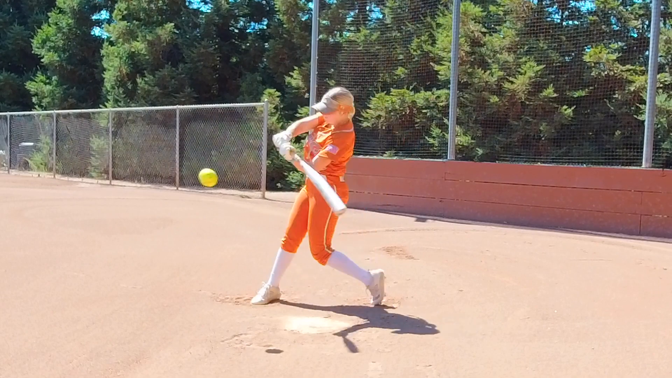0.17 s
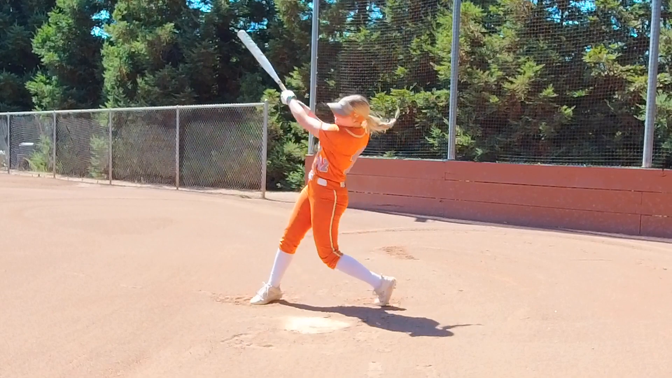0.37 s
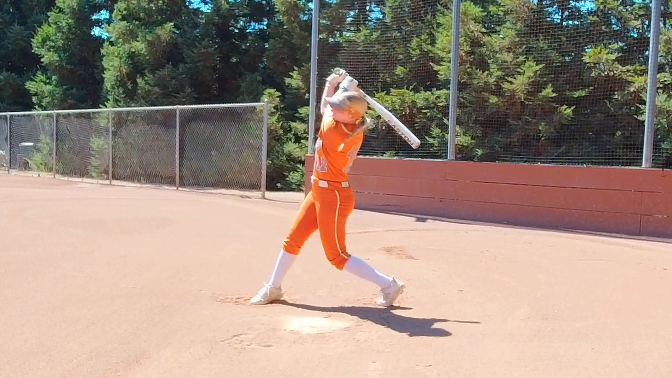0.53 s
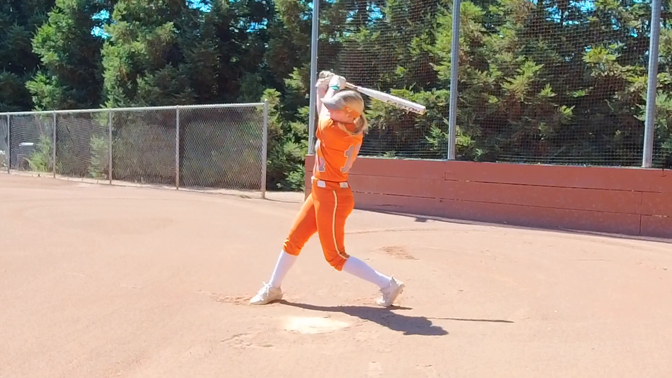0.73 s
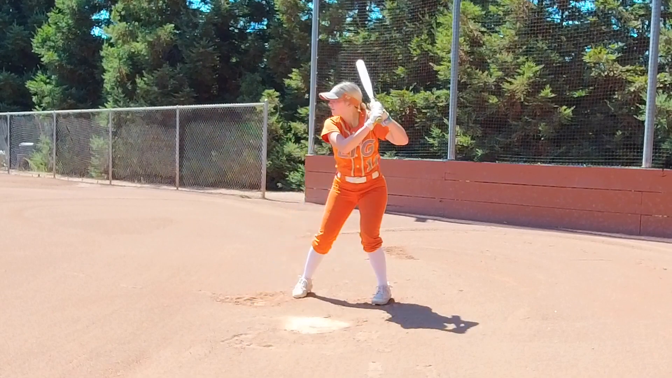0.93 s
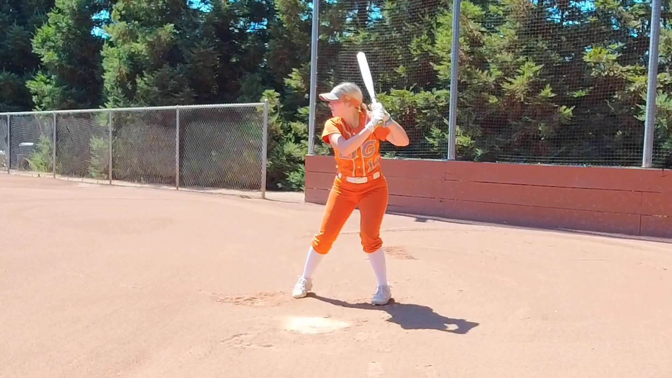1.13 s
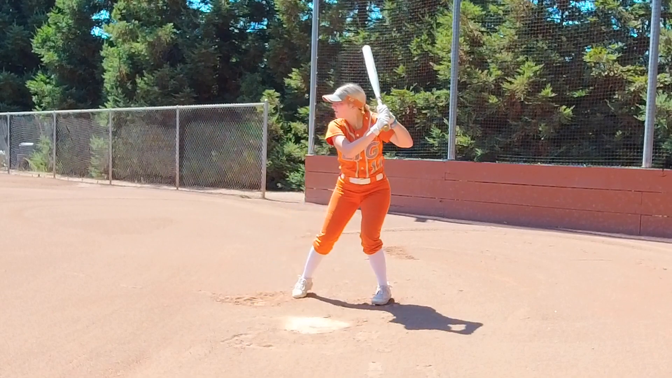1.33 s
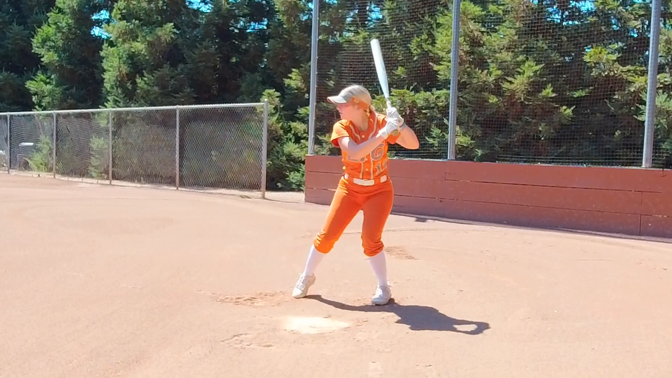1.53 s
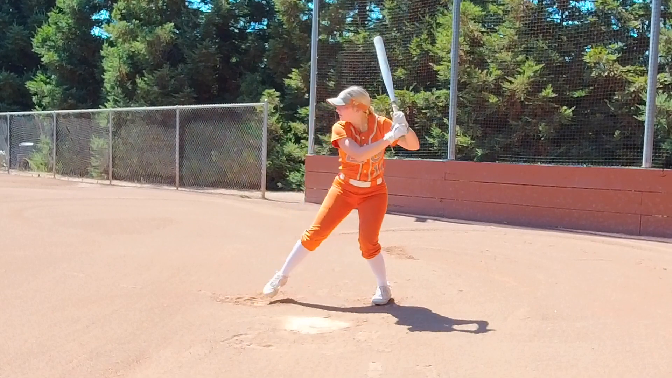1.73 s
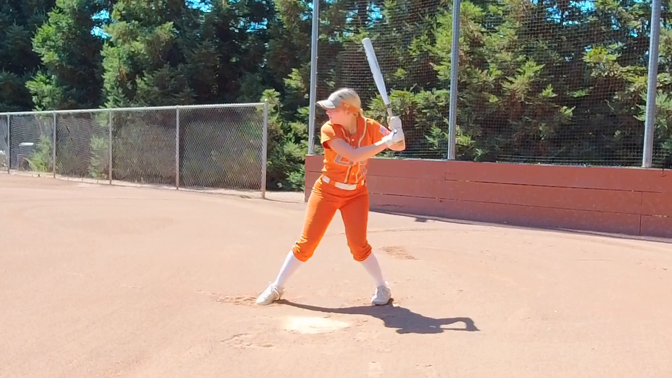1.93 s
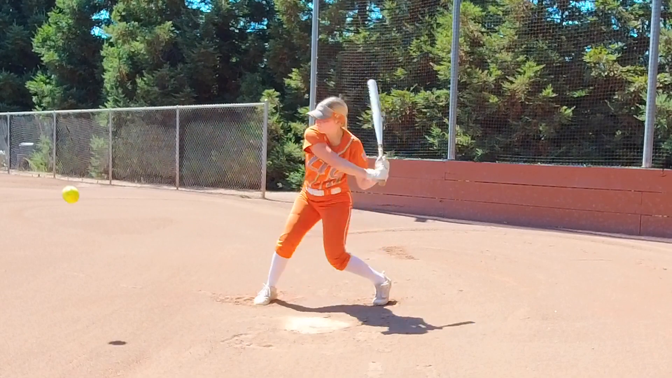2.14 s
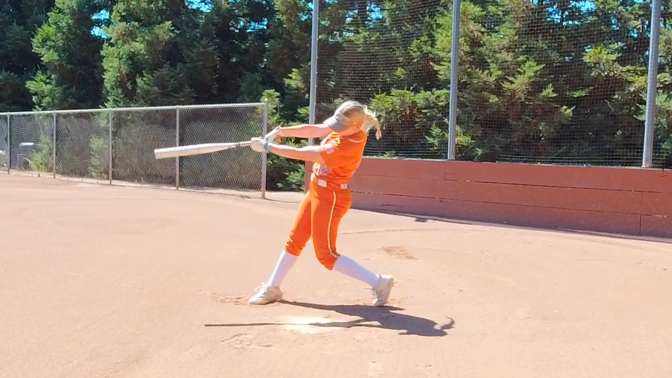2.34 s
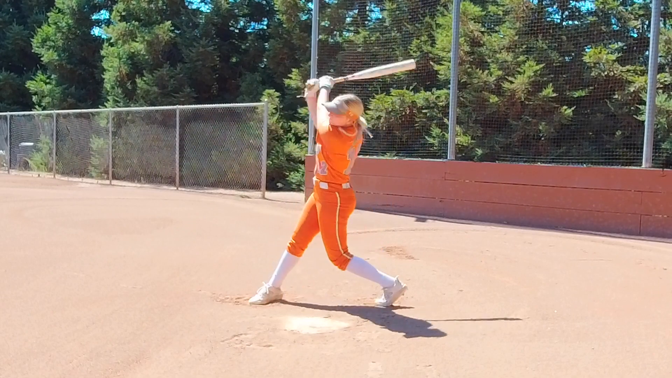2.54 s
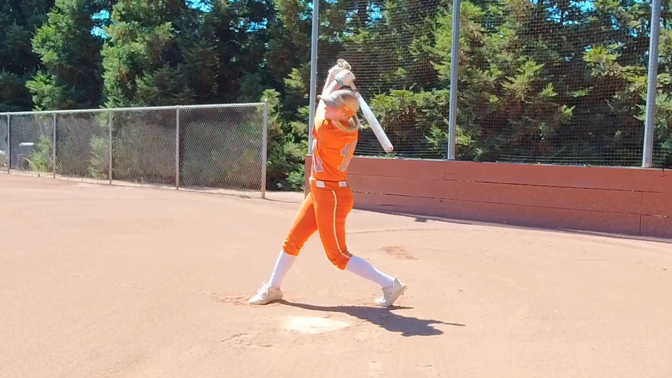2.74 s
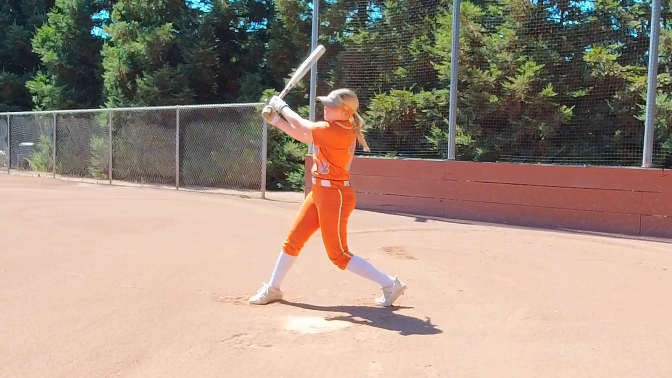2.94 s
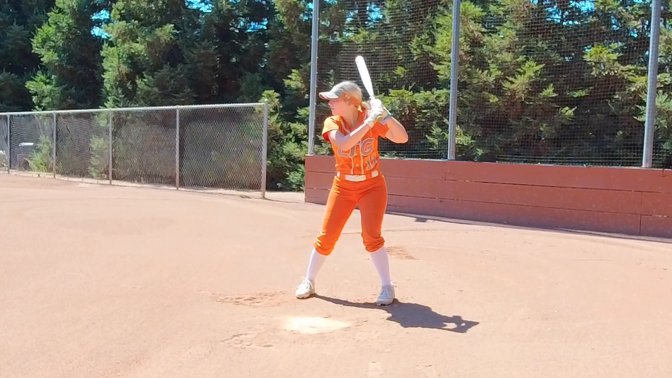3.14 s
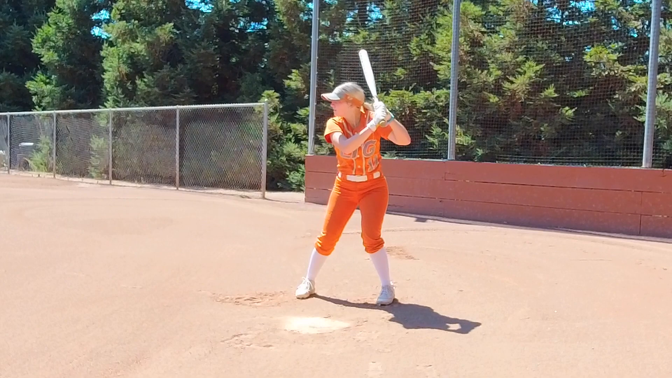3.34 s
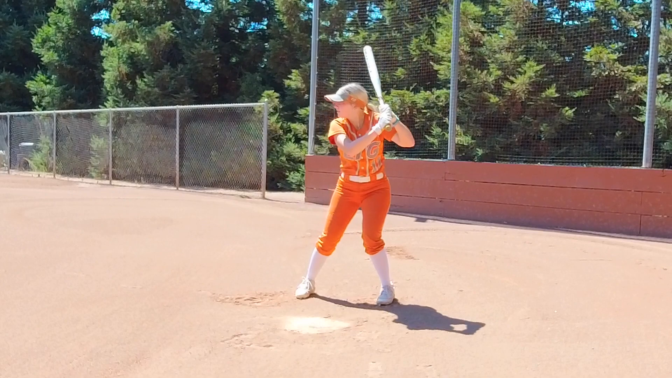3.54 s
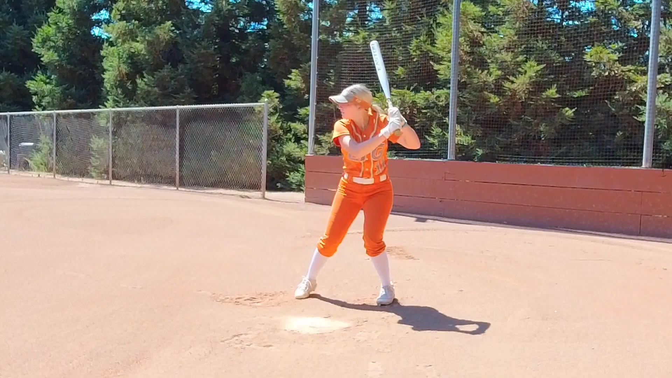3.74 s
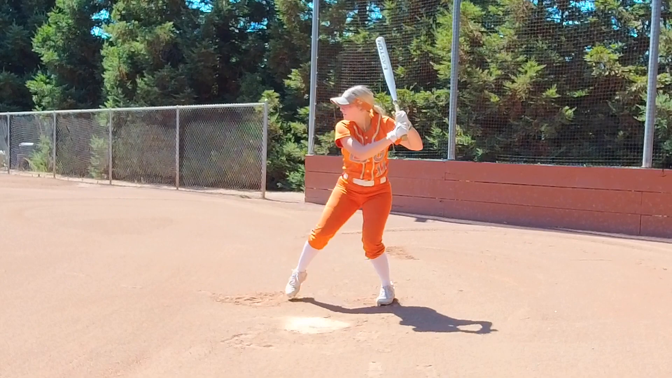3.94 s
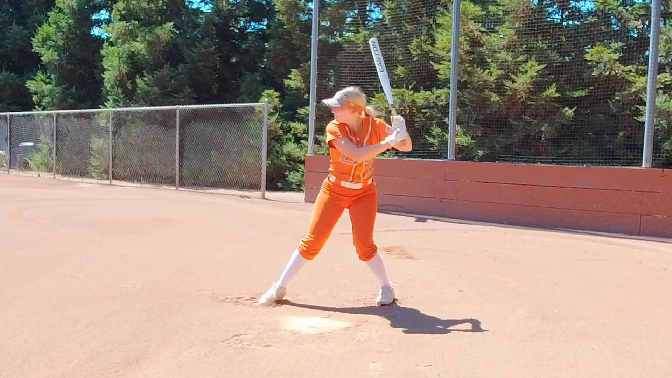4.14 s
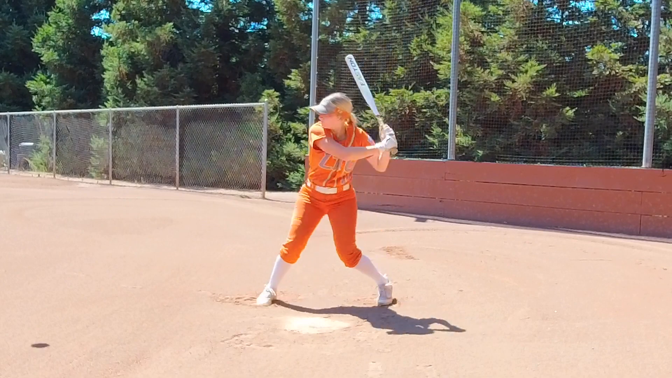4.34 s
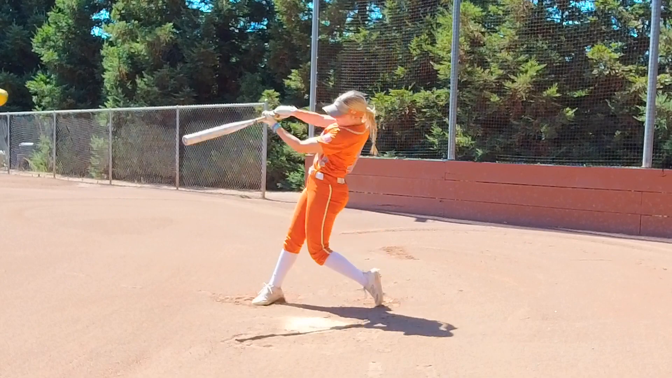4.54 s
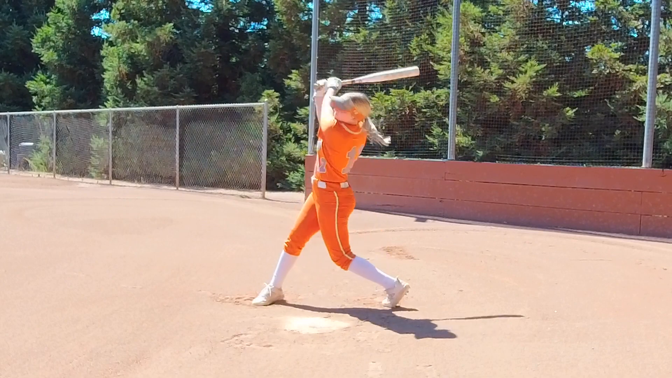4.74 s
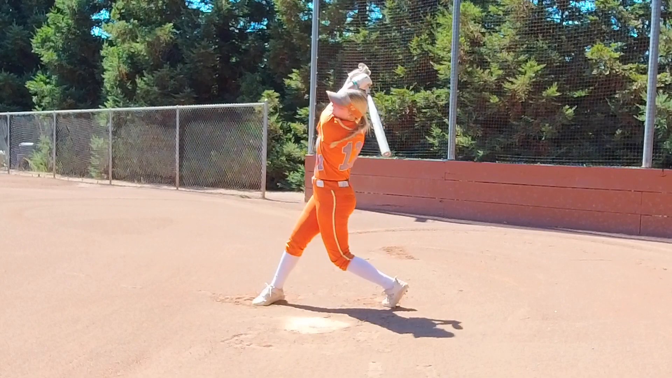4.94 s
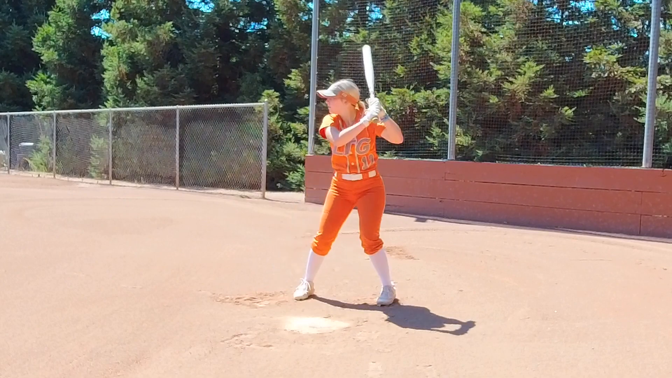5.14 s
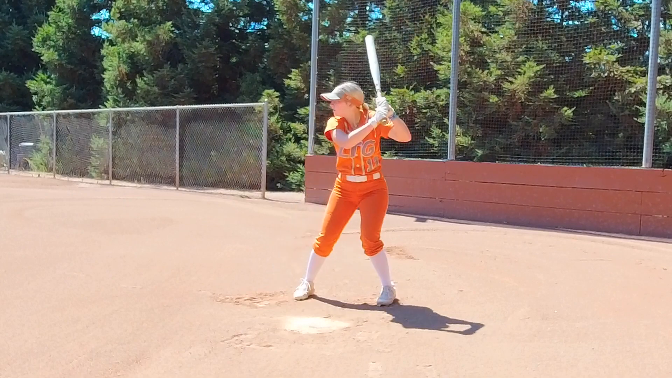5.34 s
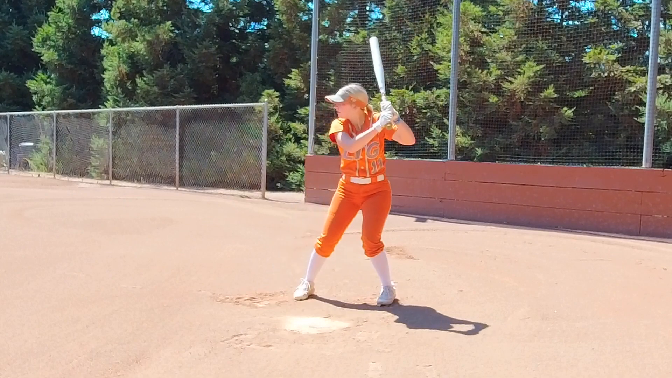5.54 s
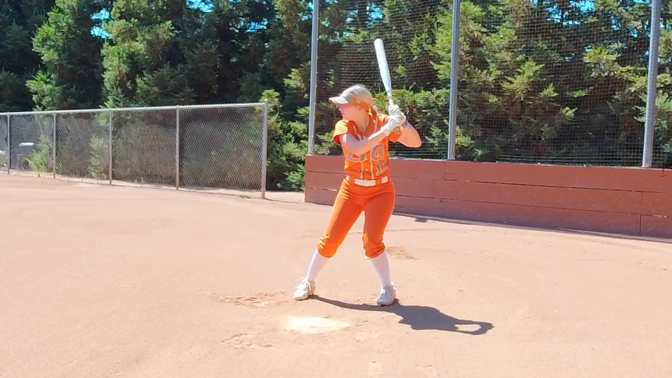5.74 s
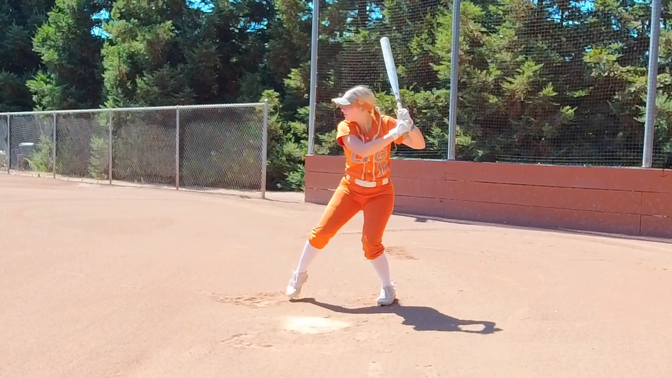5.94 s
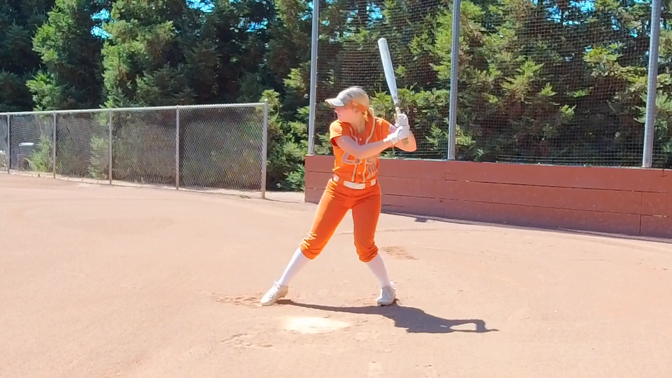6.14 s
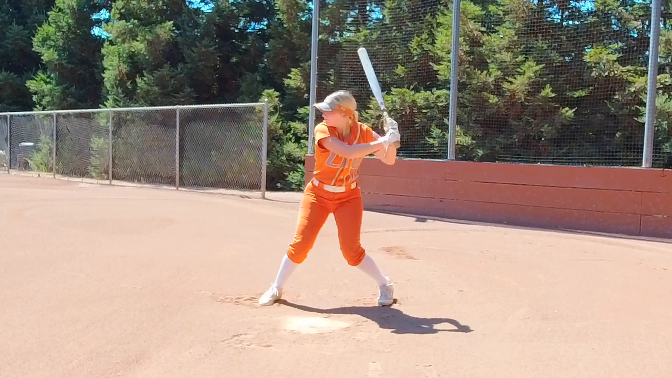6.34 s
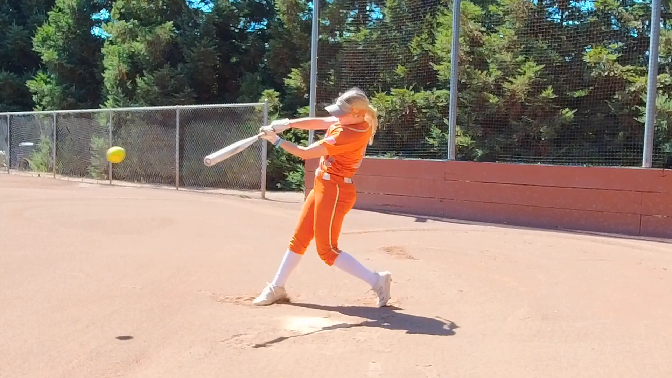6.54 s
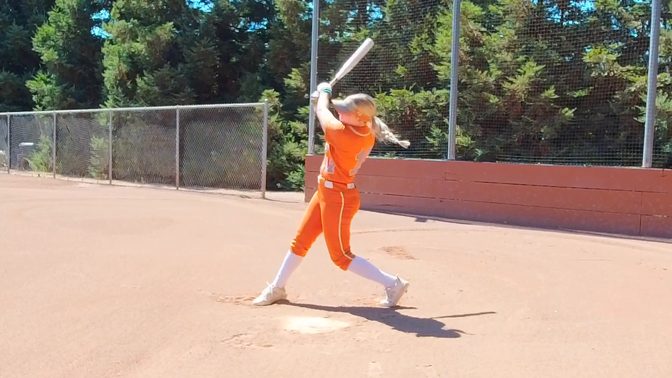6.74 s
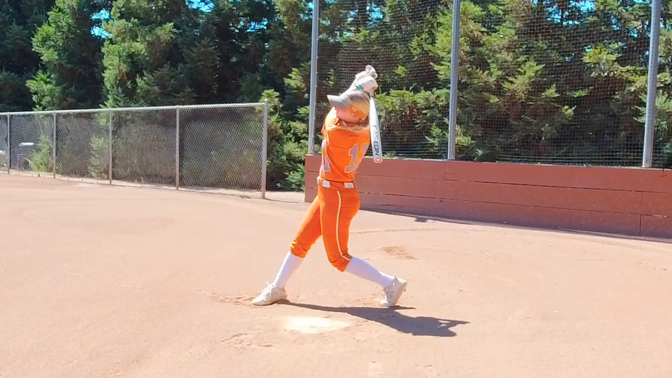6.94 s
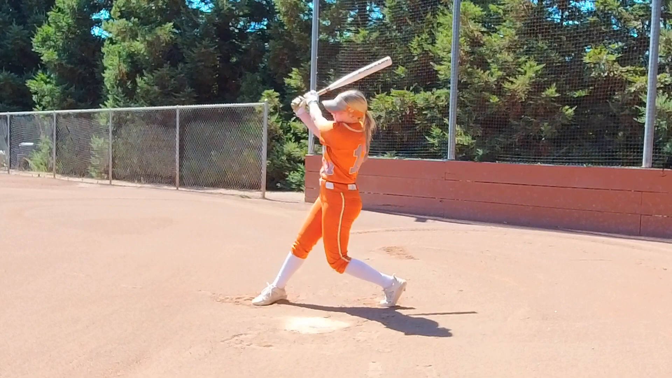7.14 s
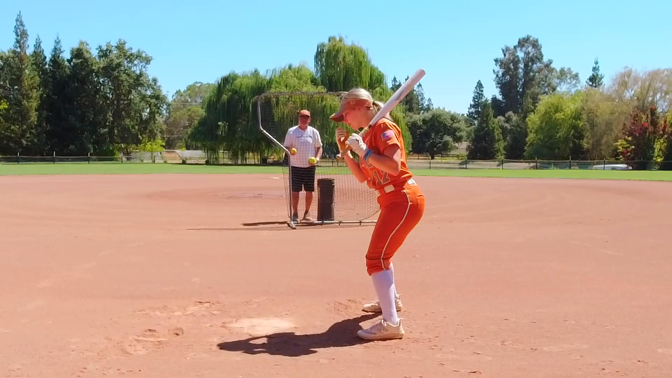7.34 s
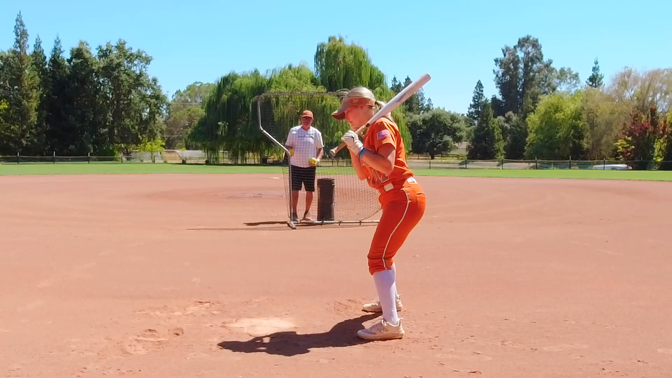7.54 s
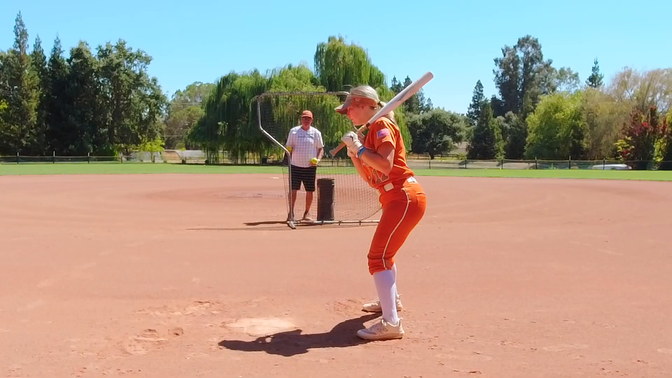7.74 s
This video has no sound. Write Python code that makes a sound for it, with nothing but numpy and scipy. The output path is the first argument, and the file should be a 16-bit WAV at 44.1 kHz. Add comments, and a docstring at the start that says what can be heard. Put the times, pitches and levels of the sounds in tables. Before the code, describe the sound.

Soft gritty footwork and a slight swish lead into the sharp crack of a bat on a softball, close to the microphone. Three more hits follow at an even pace, each echoing briefly across the open field. After the fourth, a wire fence rattles and rings, then cuts off. A faint engine hum in the distance drops at the same moment, leaving a light breeze.

```python
"""Batting practice on a dirt softball field, with two engines humming far off in a light breeze.
A shoe twists in the grit, the bat swishes, and the ball cracks off it, overloading the microphone.
The level dips for a moment while the ground, low wall and backstop, then the trees, throw the crack back.
Three more swings follow about two seconds apart, each with a stride, a pivot and a crack.
The last ball rattles a wire fence; at 7.21 seconds its ringing stops abruptly and the hum drops."""
import sys
import numpy as np
from scipy import signal
from scipy.fft import rfft, irfft, next_fast_len
from scipy.io import wavfile

SR = 44100
rng = np.random.default_rng(int(sys.argv[2]) if len(sys.argv) > 2 else 0)


def inscribe(sig):
    """Save sig as 16-bit PCM at rate SR to the path in sys.argv[1].

    A 1-D sig is mono; a 2-D sig holds one channel per row.
    Samples are clipped to [-1, 1] before scaling.
    """
    pcm = np.round(np.clip(np.atleast_2d(sig).T, -1, 1) * 32767)
    wavfile.write(sys.argv[1], SR, pcm.astype(np.int16))


N = 348390
TIME = np.arange(N) / SR
AGE = TIME[:SR]  # the first second in the life of a short sound
TOP_HZ = 15900  # upper edge of the sound
DROP_S = 7.21  # the fence's ringing stops abruptly and the hum drops


def amp(db):
    """Turns decibels into a number to multiply by."""
    return 10 ** (np.asarray(db) / 20)


def unit(x):
    """Scales a sound to an average (rms) level of 1."""
    return x / np.sqrt(np.mean(x ** 2) + 1e-20)


def bump(t, centre, width):
    """A smooth rise and fall of height 1."""
    return np.exp(-((t - centre) / width) ** 2)


def add(mix, s, sound):
    """Lays a sound into the mix, starting at s seconds."""
    part = mix[max(round(s * SR), 0):][:len(sound)]
    part += sound[:len(part)]


def colour(x, spectrum, tilt_db=0):
    """Shapes the tone by rows of (Hz, dB); the tilt brightens it by so many dB per octave."""
    size = next_fast_len(len(x) + 2048)
    octave = np.log2(np.fft.rfftfreq(size, 1 / SR) + 10)
    hz, db = np.transpose(spectrum)
    gain = amp(np.interp(octave, np.log2(hz), db) + tilt_db * (octave - np.log2(hz).mean()))
    return irfft(rfft(x, size) * gain, size)[:len(x)]


def noise(spectrum, size=N):
    """Smooth noise with the given tone, at level 1."""
    return unit(colour(rng.standard_normal(size), spectrum))


def grains(spectrum, per_s, spread_db, size=N, tilt_db=0):
    """A stream of small clicks of uneven strength, at level 1."""
    clicks = rng.choice([-1, 1], size) * (rng.random(size) < per_s / SR)
    strength = amp(spread_db * np.minimum(rng.exponential(1, size), 4))
    return unit(colour(clicks * strength, spectrum, tilt_db))


def wander(rate_hz):
    """A random drift of about 1 either way, no faster than rate_hz."""
    t = np.linspace(0, TIME[-1], 2000)
    waves = sum(np.sin(2 * np.pi * (f * t + rng.random())) for f in rate_hz * np.geomspace(.1, 1, 20))
    return np.interp(TIME, t, unit(waves))


def ring(hz, db, t60):
    """The tones of a struck object; t60 is the fade time, the seconds it takes to drop 60 dB."""
    return np.sum(amp(db[:, None] - 60 * AGE / t60[:, None]) * np.sin(2 * np.pi * hz[:, None] * AGE), 0)


# The four hits. Each row: start in seconds, strength in dB, pitch factor, crack, thump and barrel ring
# in dB, backstop echo delay in seconds, then that echo, the swish and the push of air in dB.
HITS = [(0.2108, 1.5, 1.025, 2, -0.5, -4, 0.0340, 0.5, -44.5, -46.5),
        (2.2608, 0, 1.016, 4.5, -2.5, 2.5, 0.0334, 1, -39.5, -33.5),
        (4.5033, 1, 1.0, 6, -5.5, 2, 0.0333, 1.5, -45, -41.5),
        (6.5322, 0.5, 1, 2.5, 1, -1.5, 0.033, -1.5, -41, -53)]
# Echoes off ground and wall. Each row: share of the backstop's delay, front sound in dB, rear sound in dB.
NEAR_ECHOES = [(0.134, -17.5, -8.5), (.425, -13, -19), (.745, -22, -3.5)]

def hits(rough_db=-6, rough_t60=.026):
    """Each crack, its slaps off ground, wall and backstop, and the field's answer."""
    out = np.zeros(N)
    for s, db, pitch, crack_db, thump_db, barrel_db, delay, echo_db, *_ in HITS:
        front, rear = amp(db) * bat(pitch, crack_db, thump_db, barrel_db)
        add(out, s, front + amp(db) * field_echo(rear))
        slaps = [(share * delay, amp(front_db) * front + amp(rear_db) * rear)
                 for share, front_db, rear_db in NEAR_ECHOES]
        slaps.append((delay, amp(echo_db + 5) * rear))  # the backstop
        for late, slap in slaps:
            add(out, s + late, slap + amp(rough_db) * scatter(slap, rough_t60))
    return out


# The tones of bat and ball. Each row: pitch in Hz, level in dB to the front (the microphone),
# level in dB to the rear (the backstop), fade time in seconds.
BAT_TONES = [(256, -9.5, -25, 0.017), (510, 0.5, -16, 0.015), (637, 3.5, -16.5, .017), (878, 2, -24, .016),
             (1043.2, -6, -12.5, 0.049), (1122, -18, -14.5, 0.06), (1630, 2.5, -19.5, 0.018),
             (1897, -3.5, -19.5, 0.033), (2110, -3.5, -16.5, .028), (2373, -10, -13, 0.027),
             (2539, -6.5, -19, 0.023), (2880, -15.5, -19.5, 0.017), (3245, -17.5, -16, 0.015),
             (3840, -15, -20, 0.033), (4170, -10, -18, .034), (4390, -16.5, -19.5, .03),
             (4900, -15, -18.5, 0.003)]
# The crack of contact. Each row: frequency in Hz, level in dB.
CRACK_TONE = [(100, -25.5), (500, -6.5), (1500, 6), (4200, -1.5), (5600, -8), (8300, -4.5), (11000, -12),
              (15500, -10.5)]

def bat(pitch, crack_db, thump_db, barrel_db, vary_db=1.5, crack_t60=0.029, contact_s=0.00052):
    """Bat meets ball, heard from front and rear; the spot struck sets how low and high tones ring."""
    hz, front_db, rear_db, t60 = np.transpose(BAT_TONES)
    spot_db = vary_db * rng.standard_normal(len(hz)) + thump_db * (hz < 750) + barrel_db * (hz > 1800)
    sign = -(-1) ** np.arange(len(hz))  # neighbouring tones start in opposite directions
    squeeze = 1 - np.exp(-AGE / contact_s)  # the ball flattens against the barrel
    crack = noise(CRACK_TONE, size=SR) * amp(crack_db - 60 * AGE / crack_t60)
    front = ring(sign * hz * pitch, front_db + spot_db, t60) + amp(-7.5) * crack
    rear = ring(sign * hz * pitch, rear_db + spot_db, t60) + amp(-14) * crack
    return squeeze * np.array([front, rear])


def scatter(sound, t60):
    """Many tiny reflections smear a sound."""
    taps = rng.standard_normal(SR) * amp(-60 * AGE / t60)
    return signal.fftconvolve(sound, taps / np.linalg.norm(taps))[:SR]


# The field's wash of echoes. Each row: frequency in Hz, level in dB.
FIELD_TONE = [(150, -21.5), (400, -10), (640, 0), (850, -8.5), (980, -5), (1090, 6), (1300, -5), (1650, -6),
              (2200, -1), (2800, -5), (4200, -4.5), (5300, -12.5), (8500, -10.5), (12000, -19),
              (15500, -18.5)]

def field_echo(sound, near_db=-17, near_t60=.34, build_s=0.02, ring_share=0.33):
    """Ground and fences return a short wash that keeps some of the bat's ring; the trees follow."""
    ringing = unit(signal.fftconvolve(rng.standard_normal(SR), sound)[:SR])
    patter = grains(FIELD_TONE, per_s=9000, spread_db=2, size=SR)
    wash = np.sqrt(ring_share) * ringing + np.sqrt(1 - ring_share) * patter
    build = 1 - bump(AGE, 0, build_s)
    return amp(near_db - 60 * AGE / near_t60) * build * wash + tree_echo(wash)


# How the trees dull an echo. Each row: frequency in Hz, change in dB.
TREE_TONE = [(200, 1.5), (1100, 2.5), (2200, 2.5), (4400, -1), (5200, -4), (9000, -10.5), (14000, -14.5)]
# Lines of trees that stand out. Each row: seconds after the hit, level in dB next to the murmur.
TREE_LINES = [(.345, 3), (.485, -3.5), (.61, -13)]

def tree_echo(wash, level_db=-52, patchy_db=2, first_s=0.16, rise_s=0.064, last_s=0.62, smear_s=0.024):
    """The trees answer late and dull: a slowly fading murmur, and a swell from each line of trees."""
    # beyond the farthest trees the echoes die fast
    fade_db = 19.5 * (AGE - first_s) + 170 * np.maximum(AGE - last_s, 0)
    murmur = np.clip((AGE - first_s) / rise_s, 0, 1) * amp(-fade_db)
    line_power = sum((amp(db) * bump(AGE, s, smear_s)) ** 2 for s, db in TREE_LINES)
    strength = np.sqrt(murmur ** 2 + line_power) * amp(level_db + patchy_db * wander(40.4)[:SR])
    return strength * unit(colour(wash, TREE_TONE))


# Blows on the fence. Each row: start in seconds, level in dB, fade time in seconds,
# wire ring in dB next to the rattle, brightness in dB per octave.
FENCE_BLOWS = [(6.78, -23.5, 0.3, -16, 1), (6.789, -29.5, 0.2, -10, 0), (6.825, -35.5, 0.53, -1, -1),
               (6.885, -42.5, 0.57, -18, -1), (6.936, -45, 0.41, 0, 6), (7.176, -38, .07, -35, 2.5)]
# The wire's lasting tones. Each row: pitch in Hz, level in dB, fade time in seconds.
WIRE_TONES = [(545, -32, .4), (1940, -6, .2), (2360, -16, 1), (2450, -10, 0.27), (4312, -13, .2),
              (4436, -8, .3), (6480, -0.5, 0.58), (6570, 2, 0.39), (8400, -10, 0.37), (9200, -3, 0.11),
              (12530, -3, .3), (13000, 0, .3)]
# The rattling mesh. Each row: frequency in Hz, level in dB.
RATTLE_TONE = [(150, -10.5), (330, -13), (410, -22), (520, -4.5), (920, -8.5), (1150, -2.5), (1450, -7.5),
               (2400, -4.5), (5000, -9.5), (6000, -16), (7000, -7), (10500, -15.5), (15500, -11.5)]

def fence(clump_db=1, links_db=-1, link_t60=0.059, link_count=90):
    """The mesh chatters against its posts; each blow jangles many links and a few longer-ringing wires."""
    out, wires = np.zeros(N), ring(*np.transpose(WIRE_TONES))
    t = AGE[:SR // 8]
    for s, db, t60, ring_db, bright_db in FENCE_BLOWS:
        rattle = grains(RATTLE_TONE, per_s=3000, spread_db=3.7, size=SR, tilt_db=bright_db)
        rattle *= amp(db - 60 * AGE / t60)
        link_hz = rng.uniform(502, TOP_HZ, (link_count, 1))
        links = np.sin(2 * np.pi * link_hz * t).sum(0) * amp(-60 * t / link_t60)
        add(out, s, rattle)
        for tones, tones_db in ((links, links_db), (wires, ring_db)):
            add(out, s, amp(tones_db) * signal.fftconvolve(rattle, tones / np.linalg.norm(tones))[:SR])
    abrupt_stop = np.clip((DROP_S - TIME) / 0.015 + 1, 0, 1)
    return out * amp(clump_db * wander(50)) * abrupt_stop


# The bat's swish and its low push of air. Each row: frequency in Hz, level in dB.
SWISH_TONE = [(60, -1.5), (350, -8), (600, -0.5), (1200, -4), (2500, -10), (5000, -30), (15000, -43.5)]
PUSH_TONE = [(20, -19), (42, -9.5), (68, 0), (105, -12.5), (250, -29.5), (1000, -60)]

def swings(rise_s=.022, fall_s=.012, lead_s=0.02, push_power=1.6):
    """Air rushes round the bat as it speeds up to the ball; the low push grows faster than the swish."""
    out, swish, push = np.zeros(N), noise(SWISH_TONE), noise(PUSH_TONE)
    for s, *_, swish_db, push_db in HITS:
        before, after = np.maximum(s - lead_s - TIME, 0), np.maximum(TIME - s, 0)
        speed = np.exp(-before / rise_s - after / fall_s)
        out += speed * amp(swish_db) * swish + speed ** push_power * amp(push_db) * push
    return out


# The front foot's strides. Each row: start in seconds, level in dB and brightness in dB per octave
# for the toe, then the same three for the sole.
STRIDES = [(1.843, -58, 7, 1.877, -46, -1.5), (4.104, -60, 4.5, 4.145, -44.5, 2.5),
           (6.115, -45, 0, 6.152, -46, 1.5)]
# Short scuffs. Each row: start in seconds, level in dB, length in seconds, brightness in dB per octave.
SCUFFS = [(2.167, -38.5, 0.0093, -6.5), (2.216, -42, .012, -4), (3.224, -59, .0067, 7),
          (4.329, -40, 0.01202, -1.5), (5.753, -55, 0.0071, 7.5), (5.772, -48, 0.0053, 7),
          (6.304, -45.5, 0.0062, -1), (6.423, -35, 0.0033, 1.5)]
# Shifting weight between pitches. Each row: start in seconds, level in dB, length in seconds.
SHUFFLES = [(3.576, -59, 0.077), (3.8, -60, 0.06), (5.778, -61, 0.067)]

def feet(boost_db=3, toe_length=0.0098, sole_length=0.017, settle_db=-12.5, settle_length=.07):
    """Toe, then sole, lands on the grit and the weight settles after each; shoes also scuff and shuffle."""
    out = np.zeros(N)
    for stride in STRIDES:
        for (s, db, bright_db), length in ((stride[:3], toe_length), (stride[3:], sole_length)):
            add(out, s, crunch(db, length, bright_db))
            add(out, s, crunch(db + settle_db, settle_length, bright_db))
    for s, db, length, bright_db in SCUFFS:
        add(out, s, crunch(db, length, bright_db))
    for s, db, length in SHUFFLES:
        add(out, s, crunch(db, length, bright_db=2))
    return amp(boost_db) * out


# Grit under a shoe. Each row: frequency in Hz, level in dB.
GRIT_TONE = [(150, -23.5), (380, -12.5), (530, 6.5), (800, -2), (1800, 0), (3000, -7.5), (4500, -13),
             (6500, -26), (11000, -34.5), (15500, -37)]

def crunch(db, length, bright_db):
    """A shoe presses quickly into the grit and eases off."""
    press = (1 - np.exp(-10 * AGE / length)) * np.exp(-AGE / length)
    return amp(db) * press * grains(GRIT_TONE, per_s=10000, spread_db=2.5, size=SR, tilt_db=bright_db)


# Twists of the back foot. Each row: time of the bite in seconds, level in dB, slide in dB next to the bite.
PIVOTS = [(0.0, -47, -10), (2.108, -42.5, -12), (4.35, -45.5, -9.5), (6.337, -45, -10.5),
          (6.415, -44, -5.5)]

def pivots(boost_db=0.5, clump_db=2, rise_s=0.022, fall_s=0.036, slide_s=0.13, stop_s=.02):
    """The back shoe grinds round: pressure builds to a bite, then sinks to a lighter slide."""
    pressure = np.zeros(N)
    for s, db, slide_db in PIVOTS:
        before, after = np.maximum(s - TIME, 0), np.maximum(TIME - s, 0)
        slide = amp(slide_db) * np.exp(-np.maximum(after - slide_s, 0) / stop_s)
        pressure += amp(db) * np.exp(-before / rise_s) * np.maximum(np.exp(-after / fall_s), slide)
    grinding = grains(GRIT_TONE, per_s=6000, spread_db=3.5)
    return pressure * amp(boost_db + clump_db * wander(45)) * grinding


def crumbs(count=9, level_db=-58, spread_db=2):
    """Now and then a crumb of grit cracks underfoot."""
    out = np.zeros(N)
    for s, size in rng.uniform((0, -1), (DROP_S, 1), (count, 2)):
        add(out, s, crunch(level_db + spread_db * size, length=.004, bright_db=3))
    return out


# The nearer engine's speed. Each row: time in seconds, speed in Hz.
ENGINE_SPEED = [(0, 84.02), (4.4, 84.33), (5.4, 81.5), (7.9, 82.95)]
# The notes of the two engines. Each row: multiple of that engine's speed, level in dB.
NEAR_NOTES = [(1, 0.5), (2, -23.5), (3, -6), (4, -12.5), (5, -25), (6.5, -27), (7, -24)]
FAR_NOTES = [(1, 1), (2, -15), (2.999, -17.5), (3.4, -18), (4.4, -20.5)]
# The dull drone under them. Each row: frequency in Hz, level in dB.
DRONE_TONE = [(30, -20.5), (60, -3.5), (85, 6.5), (120, -8), (200, -8), (300, -10.5), (420, -19),
              (700, -29), (2000, -54)]

def engines(level_db=-59, far_ratio=1.08, waver=0.0015, flutter_db=1.03, throb_db=2, drop_db=-18):
    """Two distant engines at slightly different speeds beat against each other; the bass throbs most."""
    out = amp(-3) * noise(DRONE_TONE)
    speed_hz = np.interp(TIME, *np.transpose(ENGINE_SPEED))
    swell_db = 3.5 * bump(TIME, centre=4.3, width=0.62)
    bass_swell_db = 4.5 * bump(TIME, centre=6.1, width=1)
    for ratio, notes in ((1, NEAR_NOTES), (far_ratio, FAR_NOTES)):
        turns = np.cumsum(ratio * speed_hz * (1 + waver * wander(5.1))) / SR
        for multiple, db in notes:
            note_db = db + flutter_db * wander(7.6)
            note_db += (bass_swell_db + throb_db * wander(10)) / multiple ** 2
            out += np.sqrt(2) * amp(note_db) * np.sin(2 * np.pi * (multiple * turns + rng.random()))
    dropped = np.clip((TIME - DROP_S) / .04, 0, 1)
    return out * amp(level_db + swell_db + drop_db * dropped)


# The open air's hiss and the breeze's rumble. Each row: frequency in Hz, level in dB.
HISS_TONE = [(240, -30.5), (400, -0.5), (459, 1.5), (761, -2), (1050, -1.5), (1200, -4), (6280, -14),
             (10600, -17), (11800, -21), (12900, -17.5), (15500, -23.5)]
BREEZE_TONE = [(20, -18.5), (45, -9), (70, 0.5), (140, -5.5), (220, -22.5), (400, -34), (1500, -57)]
# Gusts on the microphone. Each row: time of the peak in seconds, half its width in seconds, level in dB.
GUSTS = [(2.7, 0.26, -49), (7.48, .16, -51.5), (7.84, 0.15, -50.5)]

def air(hiss_db=-68.5, breeze_db=-63, lumpy_db=2):
    """Faint steady open-air hiss and a lumpy breeze with a few gusts."""
    hiss = amp(hiss_db) * noise(HISS_TONE)
    wind = amp(breeze_db) + sum(amp(db) * bump(TIME, s, width) for s, width, db in GUSTS)
    return hiss + wind * amp(lumpy_db * wander(6.1)) * noise(BREEZE_TONE)


# How much left and right differ. Each row: frequency in Hz, level in dB next to the sound they share.
STEREO_WIDTH = [(100, -33.5), (500, -44.5), (1200, -40.5), (2500, -26.5), (4500, -11.5), (8000, -5.5),
                (14000, -5)]

def scene(drift_hz=13):
    """Everything lies ahead; the treble differs between two close microphones in an ever-changing way."""
    mid = hits() + swings() + feet() + pivots() + crumbs() + fence() + engines() + air()
    paths = rng.standard_normal((2, 1024)) * amp(-60 * AGE[:1024] / .03)
    smear_a, smear_b = (signal.oaconvolve(mid, path / np.linalg.norm(path))[:N] for path in paths)
    turn = 2 * np.pi * drift_hz * TIME
    side = colour(smear_a * np.cos(turn) + smear_b * np.sin(turn), STEREO_WIDTH)
    return np.array([mid + side, mid - side])


def record(dry, loud_db=-15, hold_db=7, hold_s=0.642, dip_db=5, dip_s=0.13, lag_s=0.021, ceiling=0.97):
    """An automatic volume control dips after a loud sound and holds low; the first peaks still clip."""
    power = signal.lfilter(np.ones(64) / 64, 1, (dry ** 2).mean(0))
    loud = 10 * np.log10(power + 1e-12) >= loud_db
    since_loud = TIME - np.maximum.accumulate(np.where(loud, TIME, -10))
    cut_db = hold_db * np.clip((hold_s - since_loud) / 0.071, 0, 1) + dip_db * np.exp(-since_loud / dip_s)
    keep = np.exp(-1 / (lag_s * SR))
    late_cut_db = signal.lfilter([1 - keep], [1, -keep], cut_db)
    clipped = np.clip(dry * amp(-late_cut_db), -ceiling, ceiling)
    treble_limit = signal.firwin(255, TOP_HZ, window=("kaiser", 8), fs=SR)
    return signal.oaconvolve(clipped, treble_limit[None], "same")


dry = scene()
out = record(dry)
inscribe(out)
```